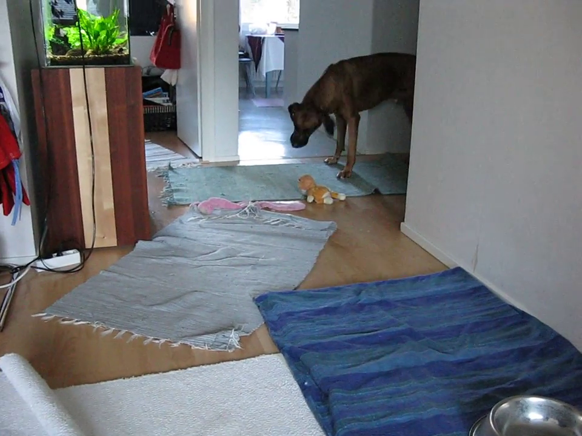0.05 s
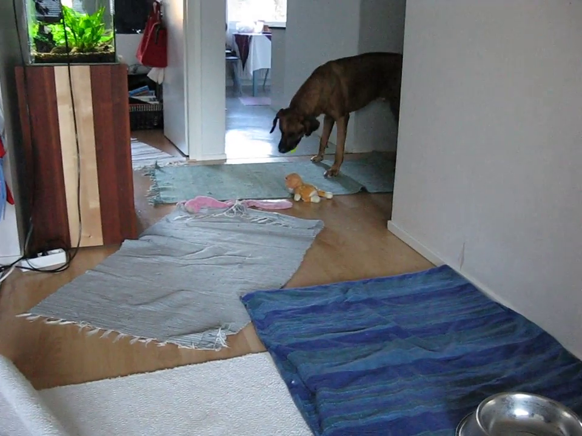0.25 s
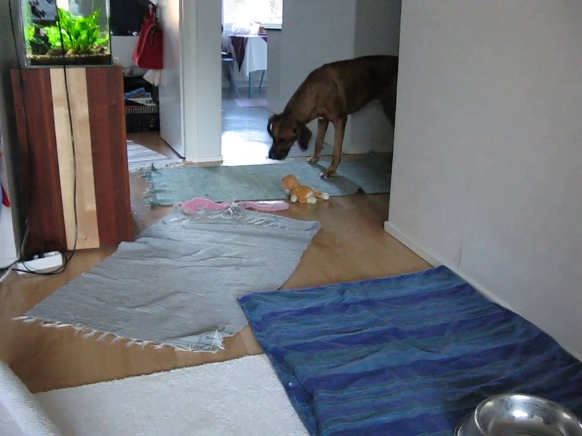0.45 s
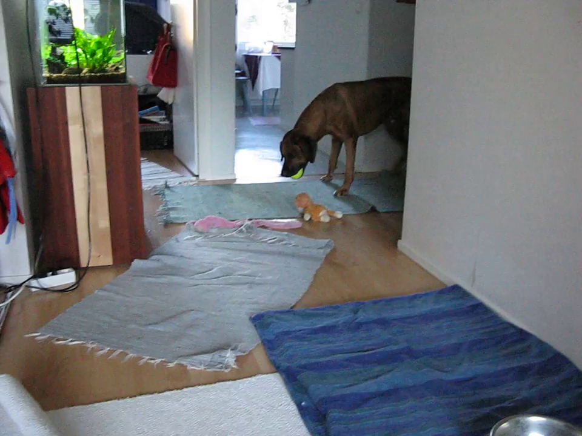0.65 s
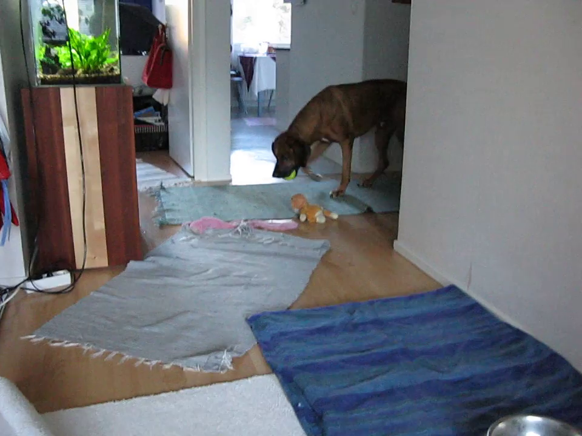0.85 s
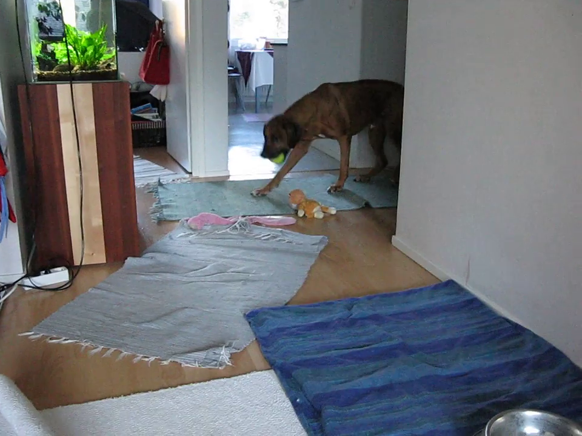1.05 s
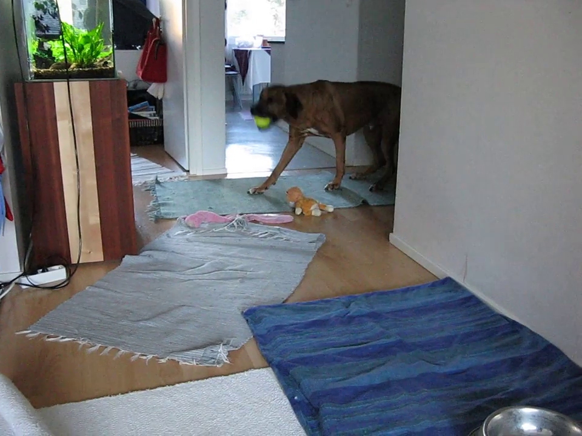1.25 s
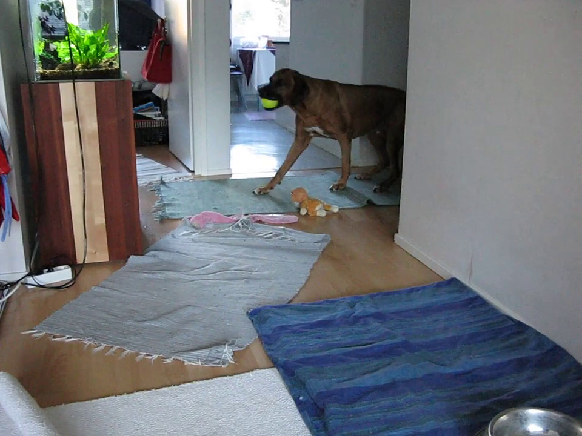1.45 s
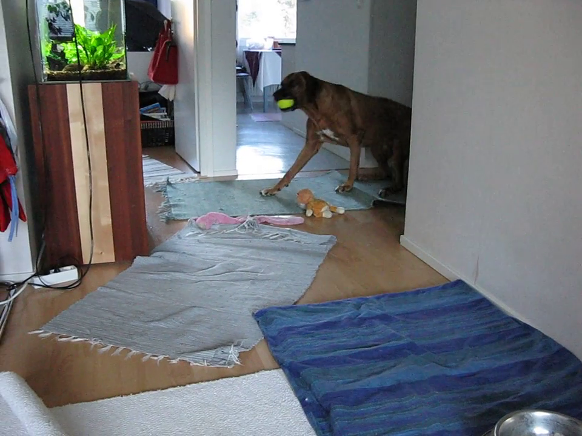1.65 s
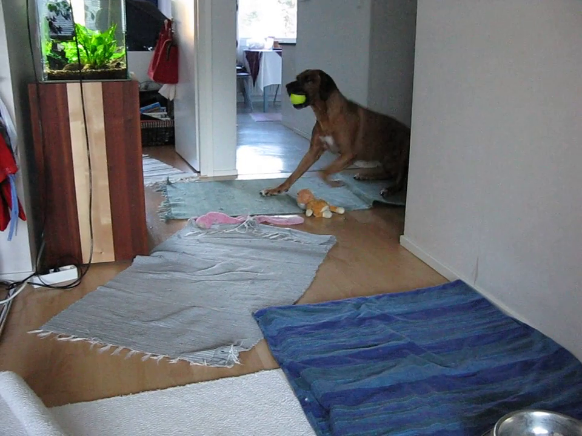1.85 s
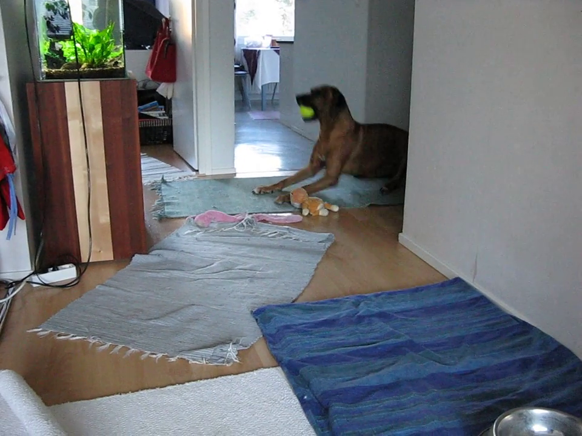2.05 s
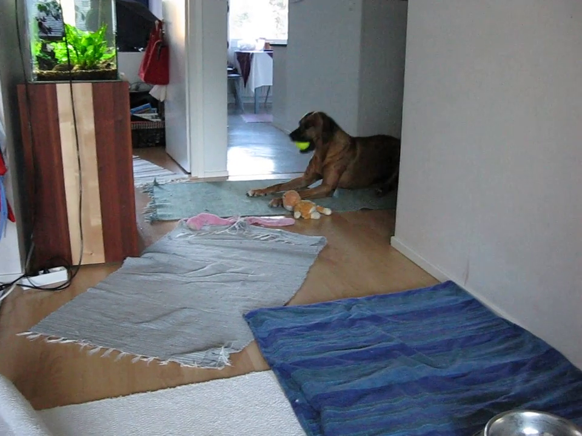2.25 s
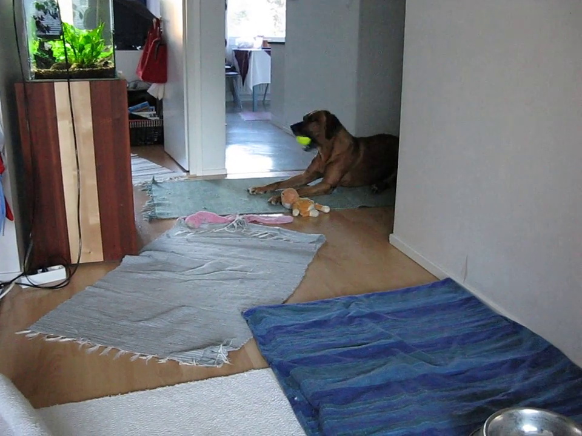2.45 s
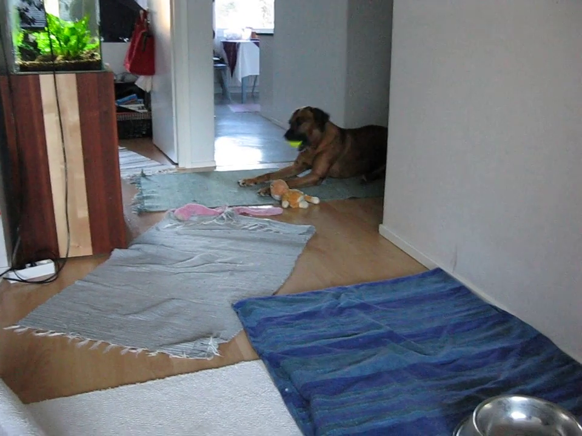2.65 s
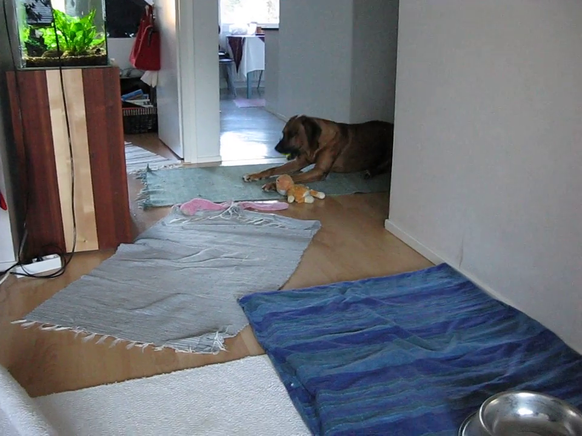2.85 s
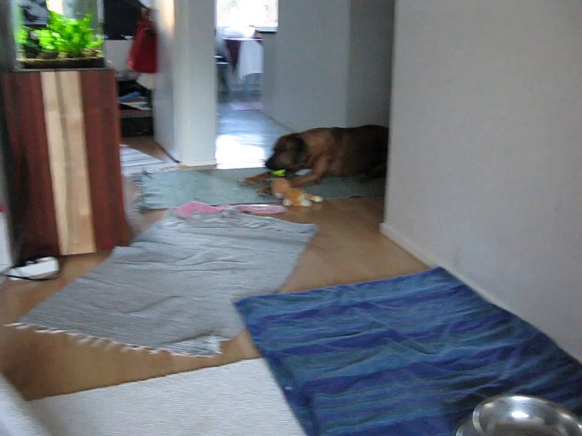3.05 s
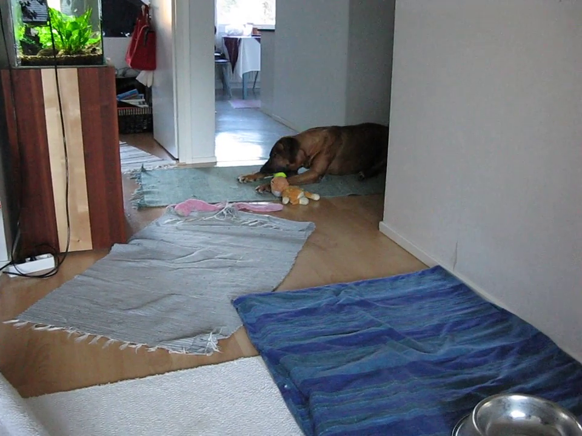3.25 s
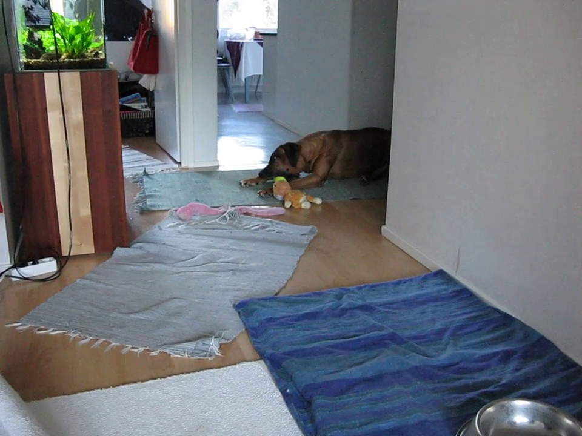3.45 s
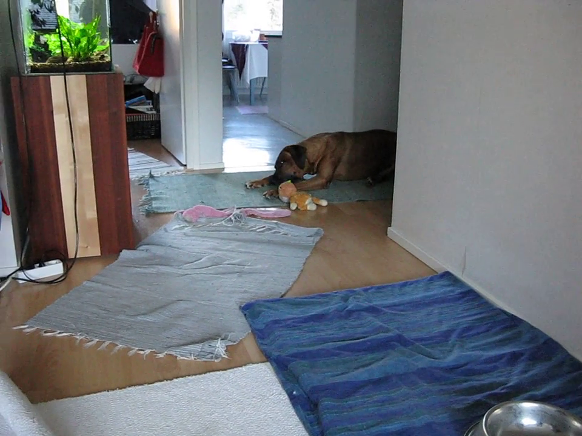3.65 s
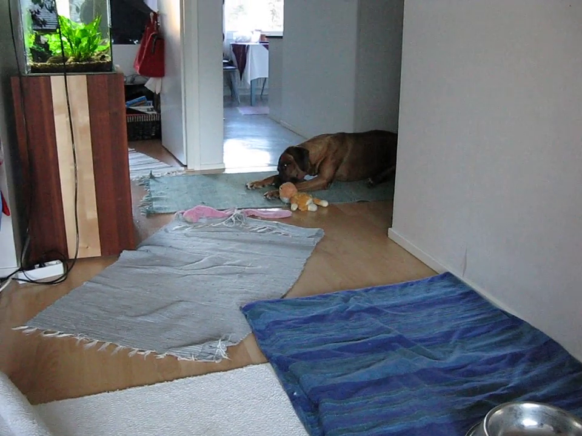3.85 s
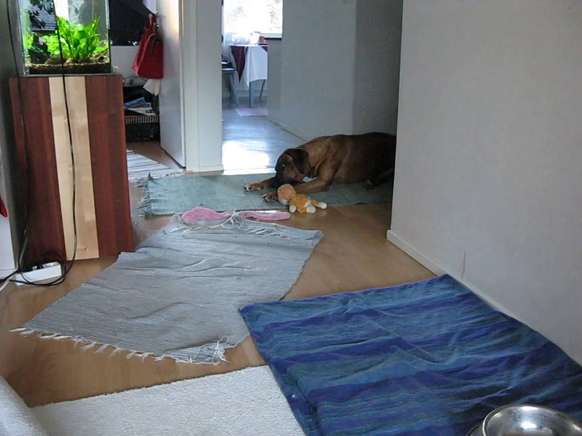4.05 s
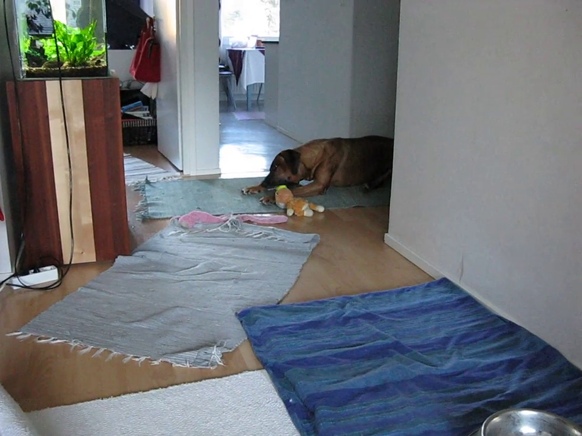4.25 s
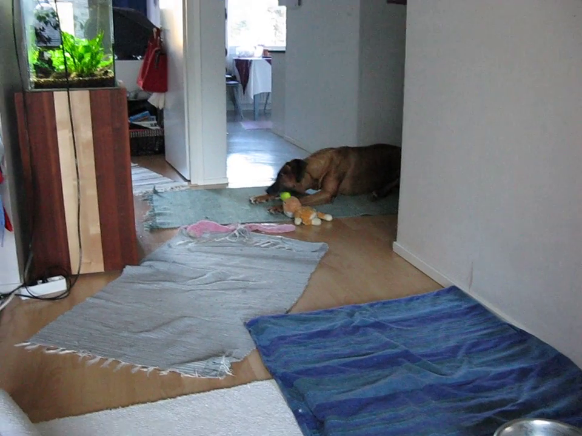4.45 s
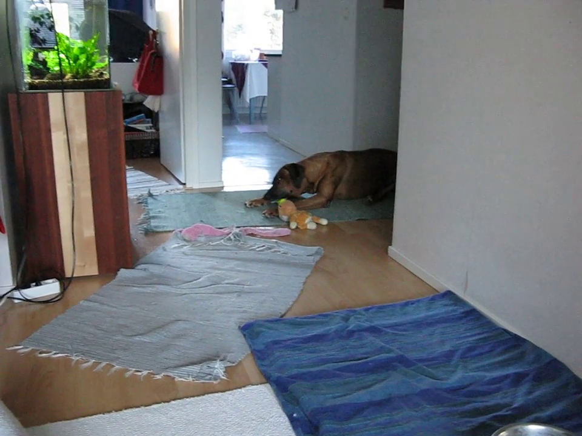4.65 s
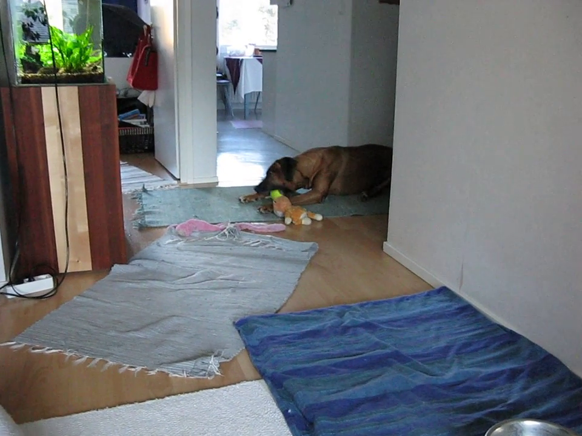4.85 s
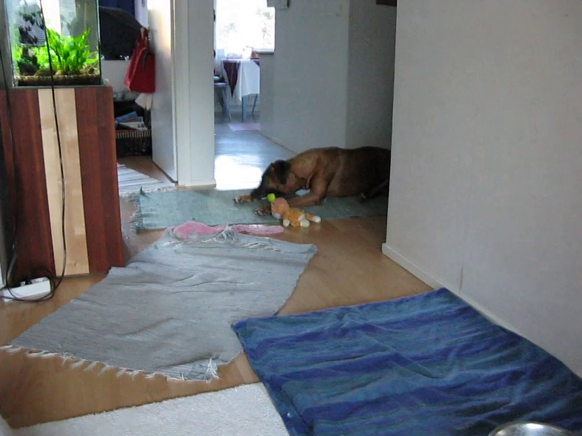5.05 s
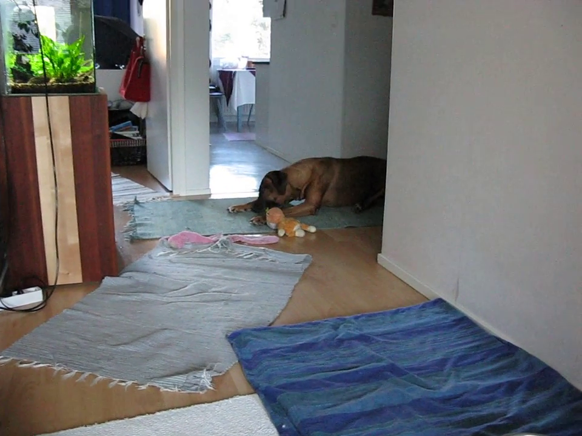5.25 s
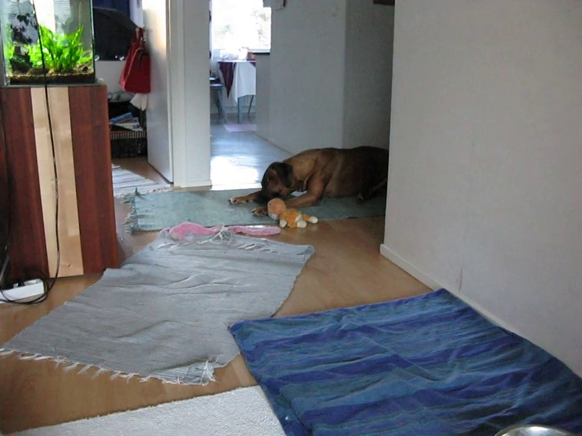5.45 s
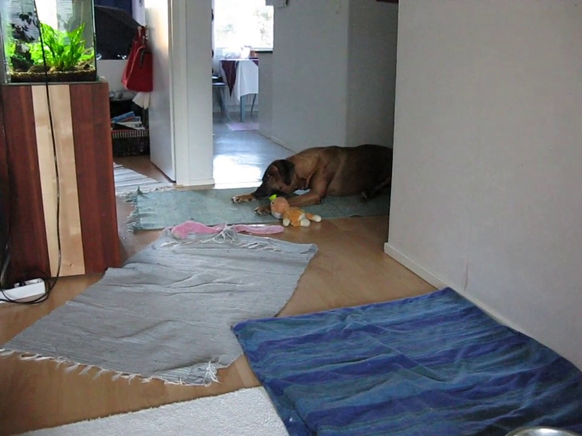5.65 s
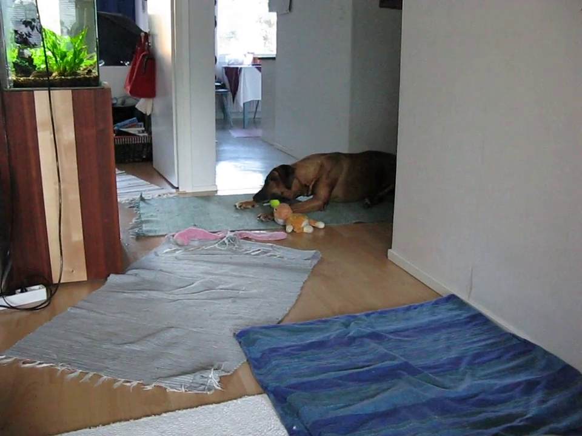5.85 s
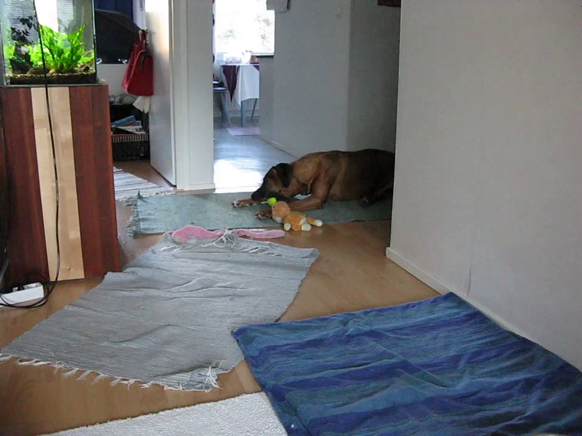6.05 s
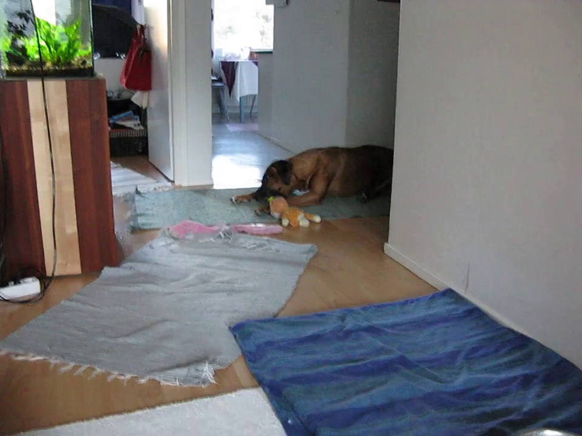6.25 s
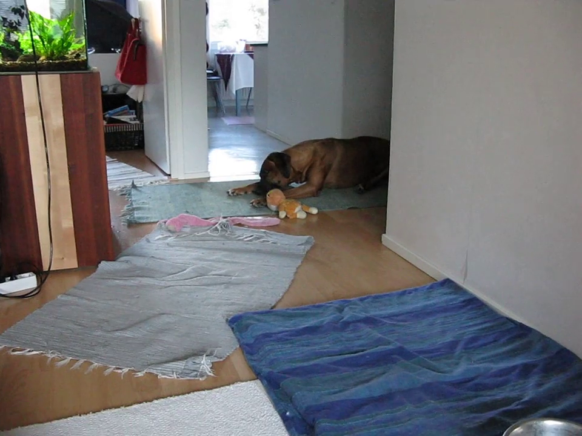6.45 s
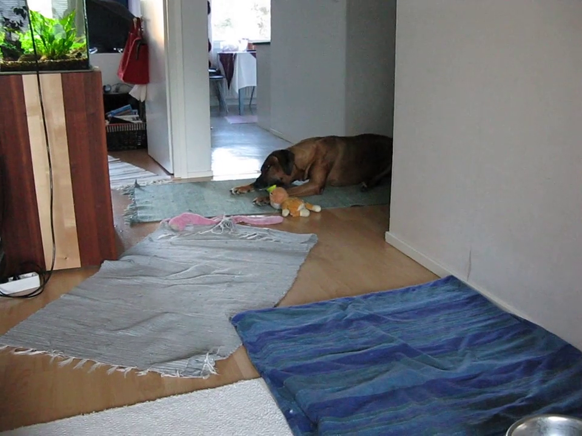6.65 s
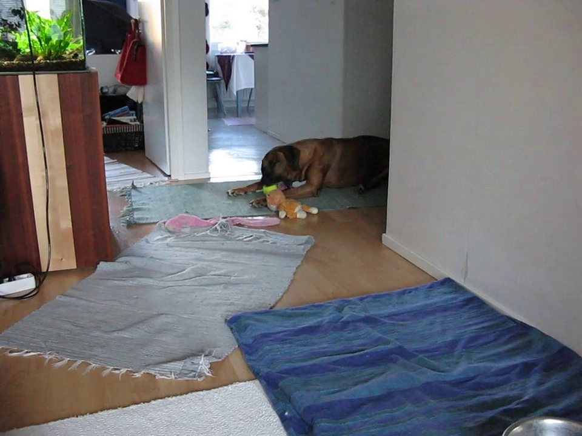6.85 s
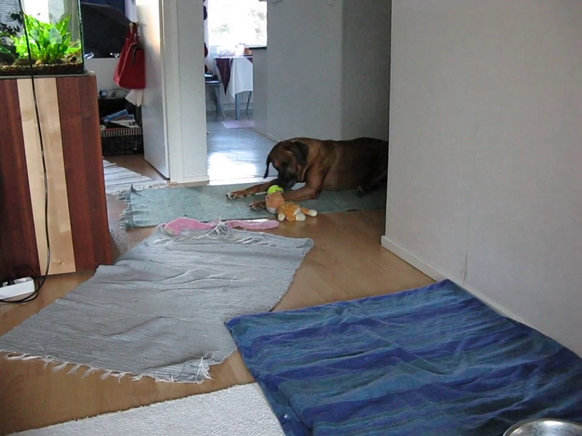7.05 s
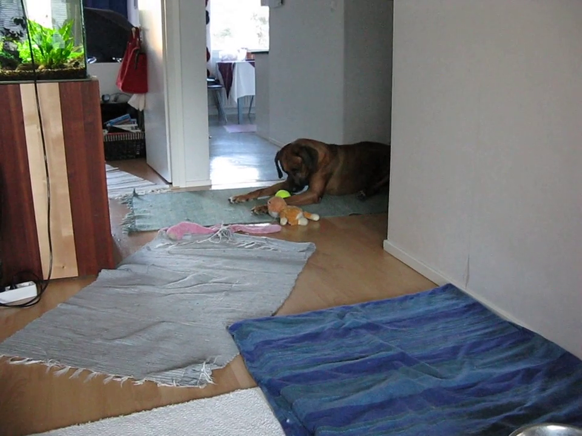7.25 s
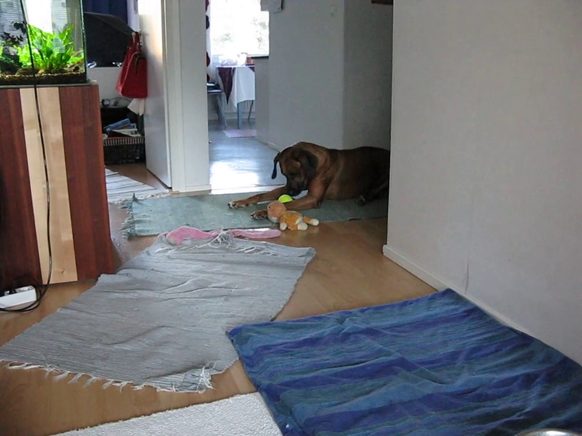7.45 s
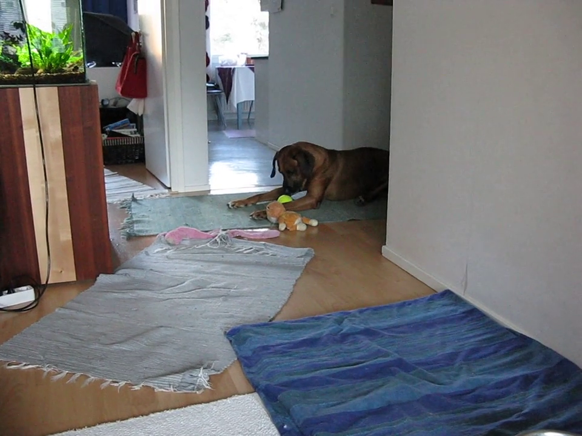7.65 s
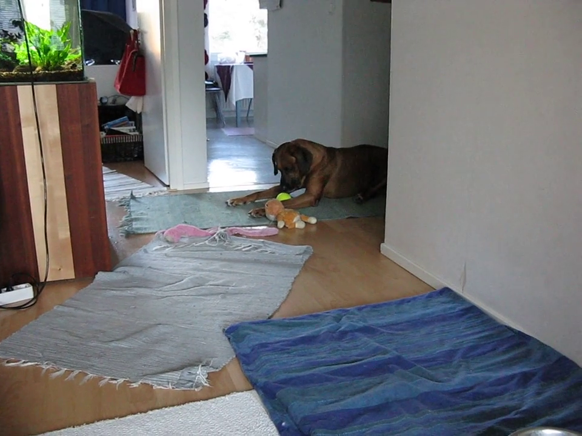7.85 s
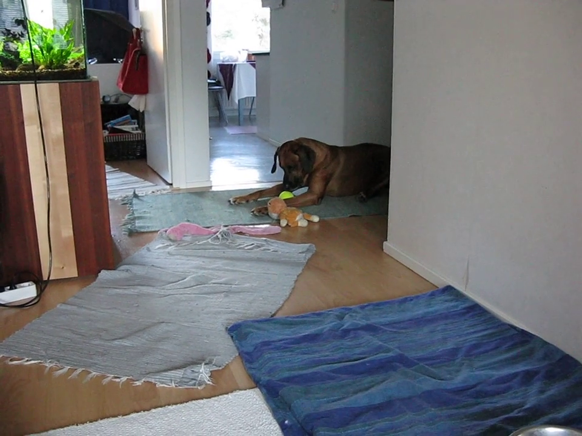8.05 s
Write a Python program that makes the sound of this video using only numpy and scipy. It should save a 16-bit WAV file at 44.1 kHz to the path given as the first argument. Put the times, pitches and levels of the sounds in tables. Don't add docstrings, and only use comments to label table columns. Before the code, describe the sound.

Six spaced bites on a squeaky dog toy, each shrieking upward, choking and wheezing back, with faint rug rustle, paw thuds and room rumble indoors.

```python
import sys
import numpy as np
from scipy import signal
from scipy.fft import rfft, irfft, next_fast_len
from scipy.io import wavfile
from scipy.ndimage import uniform_filter1d

SR = 44100
rng = np.random.default_rng(int(sys.argv[2]) if len(sys.argv) > 2 else 0)


def waveform_to_disk(signal):
    frames = np.transpose(np.atleast_2d(signal))
    scaled = np.clip(frames, -1, 1) * 32767
    samples = np.round(scaled).astype(np.int16)
    wavfile.write(sys.argv[1], SR, samples)


def boost_factor(decibels):
    exponent = np.asarray(decibels, float) / 20
    return 10 ** exponent


N = 358533
LEAD = 11025
T = (np.arange(N + LEAD) - LEAD) / SR
TUBE_HZ = 1507


def unit(x):
    return x / np.sqrt(np.mean(x ** 2))


def on_log(table, hz):
    points = np.array(table, float)
    return np.interp(np.log(np.maximum(hz, 1)), np.log(points[:, 0]), points[:, 1])


def walk(rate_hz, size):
    k = max(int(SR / rate_hz), 1)
    return unit(uniform_filter1d(uniform_filter1d(rng.standard_normal(size), k), k))


def bell(x, hz, width_hz):
    f = np.fft.rfftfreq(len(x), 1 / SR) + 1
    return irfft(rfft(x) / (1 + 1j * (f - hz * hz / f) / width_hz), len(x))


def add(out, s, x):
    i = int(round(s * SR)) + LEAD
    out[i:i + len(x)] += x[:len(out) - i]


def between(t, first, last):
    return np.linspace(first, last, len(t))


def closing(t, length_s, db):
    return db * np.clip(1 - (t[-1] - t) / length_s, 0, 1)


# (from [s], to [s], half-pitch lines [dB])
DOUBLED_FLAPS = [
    (0.691, 0.723, -4),
    (0.787, .82, -1.5),
    (1.634, 1.66, 1),
    (1.789, 1.864, -8.5),
    (3.773, 3.837, 2),
    (5.165, 5.225, -1.5),
    (6.315, 6.36, 2),
    (6.714, 6.769, -3),
]
JITTER, FLUTTER = .0006, .009
TUBE_DB, LOWEST_DB, AIR_DB, SHIMMER_DB, TILT_LIMIT_DB = 0.5, -25, -31, 1.33, 8


def reed(t, hz, db, tilt_db, colour, attack_s):
    hz = hz * (1 + JITTER * walk(92, len(t)))
    half = sum(boost_factor(d) * np.clip(np.minimum(t - a, b - t) / 0.0062, 0, 1) for a, b, d in DOUBLED_FLAPS)
    hz = hz * (1 + FLUTTER * np.minimum(2 * half, 1) * walk(270, len(t)))
    half_phase = np.pi * np.cumsum(hz) / SR
    tilt_db = np.clip(tilt_db, -TILT_LIMIT_DB, TILT_LIMIT_DB)
    tone, power = 0, 0
    for k in range(1, 31):
        f = k * hz / 2
        tube_db = TUBE_DB * np.cos(2 * np.pi * f / TUBE_HZ)
        size = boost_factor(on_log(colour, f) + tilt_db * np.log2(f / 3500) + tube_db) * (f < .45 * SR)
        if k % 2:
            size = size * half
        if k == 1:
            size = size * boost_factor(LOWEST_DB)
        tone = tone + size * np.cos(k * half_phase)
        power = power + size ** 2 / 2
    air = boost_factor(AIR_DB) * unit(bell(rng.standard_normal(len(t)), 5700, 6100))
    edge = np.clip(np.minimum((t - t[0]) / attack_s, (t[-1] - t) / 0.0025), 0, 1)
    return (tone / np.sqrt(power) + air) * boost_factor(db + SHIMMER_DB * walk(115, len(t))) * edge


# (time [s], pitch [Hz])
DRAW_PITCHES = [
    [(-.22, 2034), (-.1, 1483), (.005, 1371)],
    [(.765, 1456), (.785, 2298), (.825, 2555)],
    [(.82, 3750), (.838, 4100), (.855, 3690)],
    [(.856, 3430), (.891, 3120)],
    [(.893, 2900), (.957, 2008), (1.009, 1642), (1.043, 1555), (1.155, 1390)],
    [(1.752, 1650), (1.766, 2214), (1.794, 2295), (1.824, 2560)],
    [(1.824, 3285), (1.862, 3160)],
    [(1.864, 2870), (1.898, 2267), (1.934, 1860), (1.978, 1670), (2.01, 1554), (2.145, 1410)],
    [(2.876, 1805), (2.906, 1614), (2.924, 1365)],
    [(2.93, 1587), (2.948, 2100), (2.982, 2762), (3.032, 2032), (3.08, 1709), (3.164, 1480), (3.195, 1367)],
    [(4.085, 1542), (4.165, 1762), (4.21, 1863), (4.275, 1881), (4.3, 1700), (4.33, 1565), (4.395, 1430),
     (4.412, 1393)],
    [(5.593, 1498), (5.637, 1557), (5.679, 1557), (5.777, 1513), (5.811, 1563), (5.855, 1664),
     (5.885, 1674), (5.94, 1518), (6.005, 1402)],
    [(6.585, 1513), (6.675, 1899), (6.715, 2458), (6.75, 2402), (6.78, 1950), (6.82, 1615), (6.918, 1398)],
]
# (start level [dB], end level [dB], start brightness [dB/octave], end brightness [dB/octave])
DRAW_VOICES = [(-11.5, -25.5, -4, 1), (-32, -28, 1.5, -2.5), (-37, -27, 0, -0.5), (-25.5, -32.5, -1.5, 0),
               (-29, -28, 2, -1), (-29, -27.5, 1.5, -2), (-30, -30, 1.5, 2), (-29, -28, 0.5, -1),
               (-26.5, -25, 1, 0), (-28, -30.5, 0, -1), (-24, -25, -4, -4), (-27, -27, -2, -5),
               (-23.5, -27.5, -4, -4.5)]
# (frequency [Hz], level [dB])
COLOUR_IN = [(600, -31), (1200, -2), (1800, -2), (2900, -2), (3700, -1.5), (4800, -3.5), (6500, -4),
             (8300, -6.5), (9500, 2), (11000, 1.6), (12500, 3.5), (13800, -4.5), (14500, -12),
             (15300, -17.5)]
SUCTION_DB, DULL_DB = 3.5, -1
RELEASE_S, RELEASE_DB, SAG = 0.039, -4, .045


def draws():
    out = np.zeros(len(T))
    for curve, (db_0, db_1, tilt_0, tilt_1) in zip(DRAW_PITCHES, DRAW_VOICES):
        s, hz = np.transpose(curve)
        t = np.arange(s[0], s[-1], 1 / SR)
        hz = uniform_filter1d(np.interp(t, s, hz), int(0.0086 * SR), mode="nearest")
        db = between(t, db_0, db_1) + SUCTION_DB * np.log2(hz / TUBE_HZ)
        if hz[-1] < TUBE_HZ:
            hz = hz * (1 - SAG * np.exp((t - t[-1]) / 0.0234))
            db = db + closing(t, RELEASE_S, RELEASE_DB)
        tilt_db = between(t, tilt_0, tilt_1) + DULL_DB * np.log2(hz / TUBE_HZ)
        add(out, s[0], reed(t, hz, db, tilt_db, COLOUR_IN, 0.0025))
    return out


# (frequency [Hz], t60 [s])
ROOM_DECAY = [(250, 0.82), (1400, 0.48), (2800, 0.41), (5600, 0.42), (11000, 0.29)]
ROOM_DB, GAP_S, EARLY = 2.5, 0.0022, 1


def room(x):
    t = np.arange(int(.7 * SR)) / SR
    tail = 0
    for hz in 180 * 2 ** np.arange(0, 6.6, .5):
        band = bell(bell(rng.standard_normal(len(t)), hz, hz / 2), hz, hz / 2)
        tail = tail + band * boost_factor(-60 * t / on_log(ROOM_DECAY, hz))
    tail = tail * (t > GAP_S) * (1 + EARLY * np.exp(-t / 0.0089))
    tail = tail / np.sqrt(np.sum(tail ** 2))
    return x + boost_factor(ROOM_DB) * signal.fftconvolve(x, tail)[:len(x)]


# (frequency [Hz], density [dB/Hz])
HUSH_SPECTRUM = [(12, -69), (20, -12), (96, -8.5), (521, -10), (966, -11), (1350, -12.5), (2010, -16.5),
                 (2660, -15), (4160, -20), (5520, -21.5), (10800, -25), (15200, -32.5), (16500, -44)]
HUSH_DB = -50.5


def hush():
    size = next_fast_len(len(T))
    f = np.fft.rfftfreq(size, 1 / SR)
    noise = rfft(rng.standard_normal(size)) * boost_factor(on_log(HUSH_SPECTRUM, f))
    noise = noise / np.sqrt(1 + (38 / (f + 1)) ** 4)
    octave = np.clip(np.log2(np.maximum(f, 1) / 30), 0, 9)
    total = 0
    for k in range(10):
        band = irfft(noise * np.clip(1 - np.abs(octave - k), 0, 1), size)[:len(T)]
        total = total + band * boost_factor(0.1 * walk(9, len(T)))
    return unit(total) * boost_factor(HUSH_DB)


def scuffs(rows, grain_db):
    out = np.zeros(len(T))
    for s, length_s, hz, width_hz, db in rows:
        u = np.linspace(0, 1, int(length_s * SR))
        grains = rng.standard_normal(len(u)) * boost_factor(grain_db * walk(160, len(u)))
        band = unit(bell(bell(grains, hz, width_hz), hz, 2.4 * width_hz))
        add(out, s, boost_factor(db) * band * np.sin(np.pi * u ** 0.78))
    return out


# (time [s], length [s], centre [Hz], width [Hz], level [dB])
FLOOR_THUDS = [(.03, 0.29, 69.5, 9.8, -55), (1.11, 0.11, 60, 29, -57), (1.62, 0.25, 62, 8.7, -55),
               (2.06, 0.15, 56, 39, -48), (2.14, 0.18, 60, 44, -45), (2.22, 0.12, 64, 57, -49),
               (2.32, .1, 50, 30, -58), (3.29, 0.083, 60, 56, -53), (4.89, .2, 108, 4.9, -53),
               (6.76, .06, 60, 33, -51), (7.05, 0.18, 116, 12, -57), (7.35, 0.37, 100, 16, -59.5)]


def thuds():
    return scuffs(FLOOR_THUDS, 0.)


# (time [s], length [s], centre [Hz], width [Hz], level [dB])
RUG_RUSTLES = [(.28, 0.15, 750, 500, -53.5), (.36, 0.19, 8560, 5950, -51), (1.05, 0.23, 555, 690, -50.5),
               (1.25, 0.24, 2800, 5030, -52), (1.28, .14, 201.4, 60, -56.5), (2.04, 0.072, 626, 690, -43),
               (2.13, 0.14, 298, 610, -47.5), (2.15, 0.24, 2460, 4000, -49.5),
               (2.45, 0.35, 2000, 6000, -50.5), (4.52, 0.035, 706, 300, -51),
               (4.92, 0.27, 915, 3930, -42.5)]


def rustles():
    return scuffs(RUG_RUSTLES, 2.5)


# (time [s], soft swing before first slap [dB], stall pitch [Hz])
BITE_STARTS = [
    (.489, -16, 3700),
    (1.418, -8, 3520),
    (2.682, -28, 2140),
    (3.639, -18, 3112),
    (5.081, -24, 3148),
    (6.114, -7.5, 3150),
]
# (rest pitch [Hz], creep [Hz/s], jaws close after [s], surge [Hz/s], softness [s])
BITE_CLIMBS = [(1297, 1700, .132, 17500, 0.00403), (1255, 1750, .165, 21000, 0.024),
               (1302, 450, .148, 9500, 0.016), (1299, 3300, .062, 18000, 0.0029),
               (1314, 3900, .04, 32000, 0.0023), (1277, 1300, .14, 21000, 0.014)]
# (length [s], start level [dB], end level [dB],
# start brightness [dB/octave], end brightness [dB/octave])
BITE_VOICES = [(0.24, -23, -25, 5.5, 4), (0.26, -23, -26, 6.5, 3.5), (0.201, -24, -23.5, 4, 1.5),
               (.19, -23.5, -22.5, -0.5, -4), (.11, -23, -22.5, 1, -2), (0.23, -24, -22.5, -.5, -1)]
# (frequency [Hz], level [dB])
COLOUR_OUT = [(600, -38), (1200, -3.5), (1500, -6), (2900, -4), (3700, -5.5), (4600, -7), (6200, -6),
              (7700, 0), (9300, -2.5), (10500, -7), (12000, -16.5), (13500, -20), (14500, -31),
              (15500, -30)]
CHOKE_SHARP, CLOSE_S, CLOSE_DB, SLAP_DB = 14, 0.02, -14, 5


def bites():
    out = np.zeros(len(T))
    for start, climb, voice in zip(BITE_STARTS, BITE_CLIMBS, BITE_VOICES):
        s, swing_db, stall_hz = start
        rest_hz, creep, knee_s, surge, soft_s = climb
        length_s, db_0, db_1, tilt_0, tilt_1 = voice
        t = np.arange(0, length_s, 1 / SR)
        free_hz = rest_hz + creep * t + surge * soft_s * np.logaddexp(0, (t - knee_s) / soft_s)
        hz = free_hz / (1 + (free_hz / stall_hz) ** CHOKE_SHARP) ** (1 / CHOKE_SHARP)
        db = between(t, db_0, db_1) + closing(t, CLOSE_S, CLOSE_DB)
        db = db + SLAP_DB * np.exp(-t / 0.019)
        u = np.arange(-.03, 0, 1 / SR)
        swing = np.exp(u / 0.0031) * np.cos(2 * np.pi * 0.902 * rest_hz * u)
        add(out, s - .03, boost_factor(db[0] + swing_db) * swing)
        add(out, s, reed(s + t, hz, db, between(t, tilt_0, tilt_1), COLOUR_OUT, 0.00087))
    return out


# (time [s], length [s], depth [dB], attack [s], release [s])
GAIN_DUCKS = [
    (.495, 0.61, -16, 0.07, 0.041),
    (1.423, 0.65, -17, 0.062, 0.024),
    (2.677, 0.62, -14.5, 0.14, 0.4),
    (3.649, 0.26, -10, 0.1, 0.077),
    (4.145, 0.26, -2.5, .1, 0.091),
    (5.091, 0.19, -11, 0.048, 0.1),
    (5.498, 0.079, -7, 0.02, 0.038),
    (6.122, 0.29, -12, 0.18, 0.046),
    (6.541, 0.048, -8, .02, .04),
    (6.676, 0.23, -5, .06, 0.072),
]
IDLE_DB, EASE_PER_S = 0.25, 1


def gain():
    db = IDLE_DB
    for s, length_s, depth_db, attack_s, release_s in GAIN_DUCKS:
        u = T - s
        dip = np.clip(np.minimum(u / attack_s, (length_s - u) / release_s), 0, 1)
        db = db + depth_db * (1 - EASE_PER_S * u) * dip
    return boost_factor(db)


# (time [s], length [s], level [dB])
CHOKED_REEDS = [
    (0.701, 0.034, -33),
    (1.66, 0.085, -32),
    (3.81, 0.097, -29),
    (5.18, 0.098, -31.5),
    (6.34, 0.072, -30),
]
# (frequency [Hz], width [Hz], level [dB])
TUBE_NOTES = [(1504, 17, -10.5), (3105, 82, 1), (4750, 190, 6.5), (5950, 330, -1.5), (7760, 270, -8),
              (10300, 400, -5.5)]


def chokes():
    out = np.zeros(len(T))
    for s, length_s, db in CHOKED_REEDS:
        u = np.linspace(0, 1, int(length_s * SR))
        air = 0
        for hz, width_hz, note_db in TUBE_NOTES:
            air = air + boost_factor(note_db) * unit(bell(rng.standard_normal(len(u)), hz, width_hz))
        add(out, s, boost_factor(db - 7.7 * u) * unit(air) * np.clip(np.minimum(u, 1 - u) * 10, 0, 1))
    return out


# (time [s], fall time [s], length [s], level [dB], brightness [dB/octave])
RELEASE_CHIRPS = [
    (0.732, 0.0088, 0.02, -18, 3.5),
    (1.713, 0.0087, 0.027, -16, 4.5),
    (4.037, .006, 0.02, -13.5, -2),
    (5.496, 0.0088, .045, -14, 0.4),
    (6.5257, .0085, 0.032, -14.5, -0.3),
]
CHIRP_FROM_HZ, CHIRP_TO_HZ, FADE_DB_S, RISE_S = 5450, 1142, 310, 0.0058


def chirps():
    out = np.zeros(len(T))
    for s, fall_s, length_s, db, tilt_db in RELEASE_CHIRPS:
        t = np.arange(0, length_s, 1 / SR)
        hz = CHIRP_TO_HZ + (CHIRP_FROM_HZ - CHIRP_TO_HZ) * np.exp(-t / fall_s)
        add(out, s, reed(s + t, hz, db - FADE_DB_S * t, tilt_db, COLOUR_OUT, RISE_S))
    return out


# (time [s], centre [Hz], level [dB])
TOOTH_TICKS = [
    (2.969, 600, -34),
    (3.006, 800, -30),
    (4.635, 5000, -45),
    (6.777, 2600, -20),
    (6.778, 344, -37),
]


def ticks():
    out = np.zeros(len(T))
    for s, hz, db in TOOTH_TICKS:
        t = np.arange(2048) / SR
        knock = bell(rng.standard_normal(2048) * np.exp(-t / 0.0076), hz, 0.83 * hz)
        add(out, s, boost_factor(db) * knock / np.abs(knock).max())
    return out


def scene():
    ball = draws() + bites() + chokes() + chirps()
    dog = thuds() + rustles() + ticks()
    return (room(ball / gain() * boost_factor(-2)) + dog + hush())[None, LEAD:]


def top_cut(x):
    return signal.sosfilt(signal.butter(12, 16860, fs=SR, output="sos"), x)


def record(dry):
    top = signal.ellip(12, .2, 80, 15720, fs=SR, output="sos")
    mix = signal.sosfilt(top, dry * gain()[LEAD:])
    return top_cut(mix)


dry = scene()
out = record(dry)
waveform_to_disk(out)
```